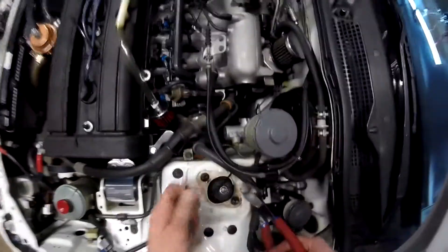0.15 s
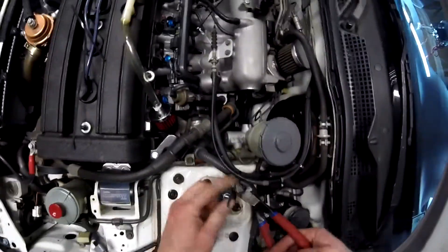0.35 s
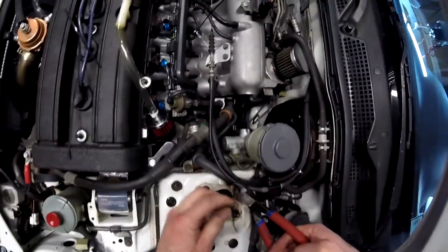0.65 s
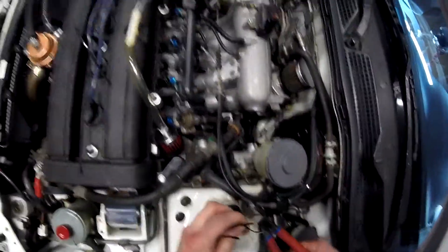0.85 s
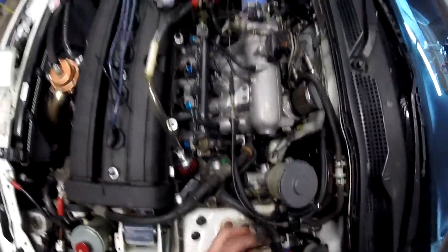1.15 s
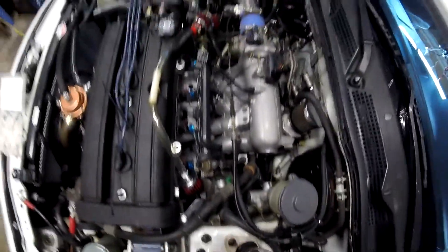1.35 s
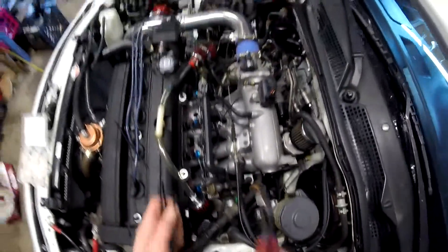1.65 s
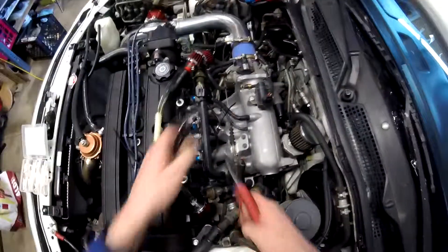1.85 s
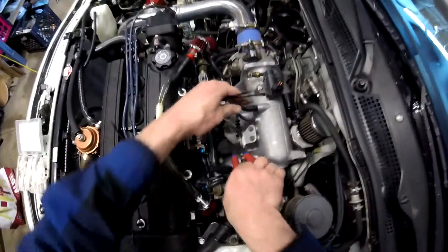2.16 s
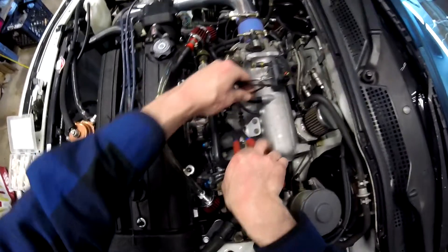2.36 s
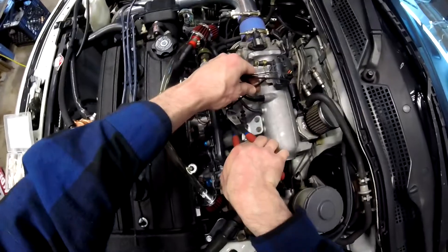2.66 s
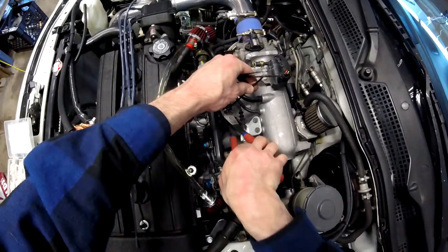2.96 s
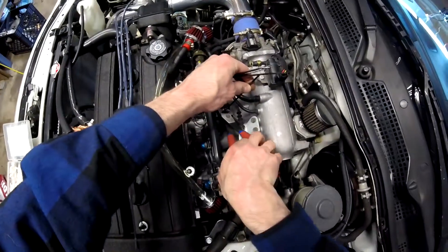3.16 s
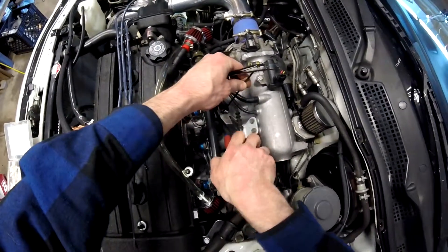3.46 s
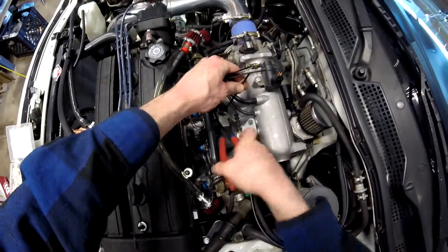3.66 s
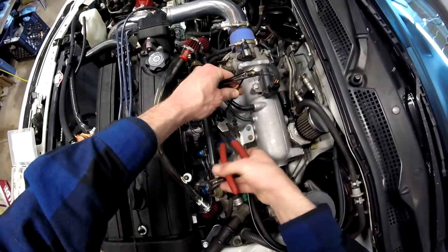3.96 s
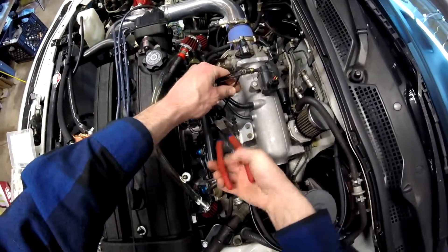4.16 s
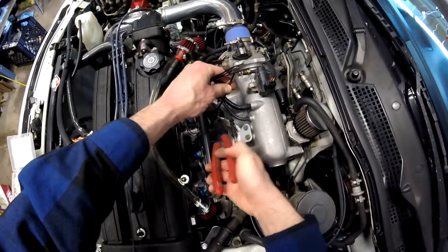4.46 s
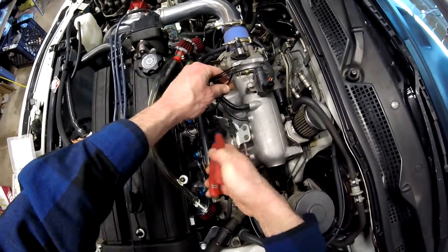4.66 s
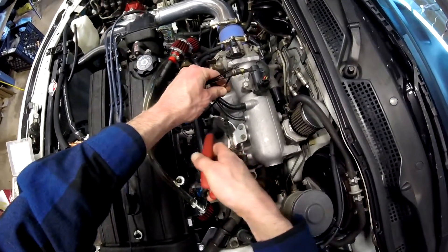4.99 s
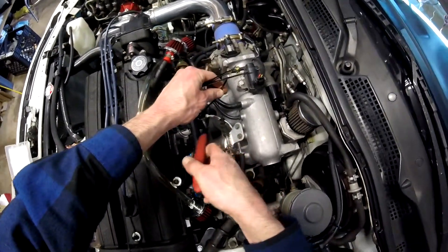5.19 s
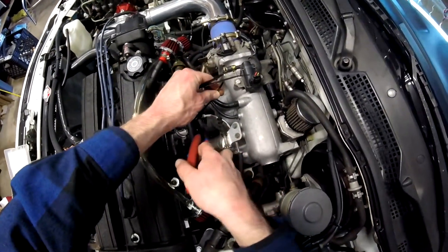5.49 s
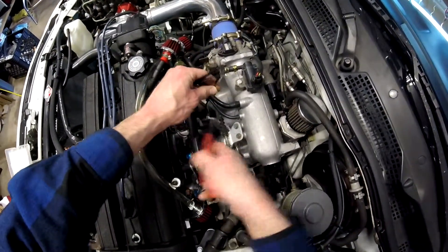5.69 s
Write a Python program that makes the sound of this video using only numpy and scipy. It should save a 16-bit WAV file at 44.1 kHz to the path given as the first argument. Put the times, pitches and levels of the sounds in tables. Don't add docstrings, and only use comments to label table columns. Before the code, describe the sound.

A sharp steel snip, then a tool clatters onto sheet metal and bounces, followed by faint pivot squeaks over a steady garage rumble and hum.

```python
import sys
import numpy as np
from scipy import signal
from scipy.fft import rfft, irfft
from scipy.io import wavfile
from scipy.ndimage import uniform_filter1d, minimum_filter1d

SR = 44100
rng = np.random.default_rng(int(sys.argv[2]) if len(sys.argv) > 2 else 0)


def store_wav(level_fs):
    pcm = np.round(np.clip(np.atleast_2d(level_fs), -1, 1) * 32767)
    wavfile.write(sys.argv[1], SR, pcm.T.astype(np.int16))


def ratio(d):
    e = np.asarray(d, float) / 20
    return 10 ** e


N = 257082
T = np.arange(N) / SR
CLIP_N = 22050


def unit(x):
    return x / np.sqrt(np.mean(x ** 2))


def band(x, hz, width_hz):
    return signal.lfilter(*signal.iirpeak(hz, hz / width_hz, SR), x)


def body(x, peaks):
    return sum((-1) ** k * ratio(db) * band(x, hz, width_hz) for k, (hz, width_hz, db) in enumerate(peaks))


def ring(x, hz, t60_s):
    pole = np.exp(2j * np.pi * hz / SR - np.log(1000) / (t60_s * SR))
    return signal.lfilter([1], [1, -pole], x).imag


def add(out, start_s, x):
    i = int(start_s * SR)
    out[i:i + len(x)] += x[:N - i]


def fade(t60_s):
    return np.exp(-np.log(1000) * np.arange(CLIP_N) / SR / t60_s)


def burst_noise():
    return rng.standard_normal(CLIP_N)


def walk(rate_hz):
    hold = int(SR / rate_hz)
    steps = np.repeat(rng.standard_normal(N // hold + 1), hold)
    return unit(uniform_filter1d(uniform_filter1d(steps, hold), hold)[:N])


def spectrum(points, hz):
    point_hz, point_db = np.transpose(points)
    return ratio(np.interp(np.log(np.maximum(hz, 1)), np.log(point_hz), point_db))


def strokes(rows, rise_db_s, fall_db_s):
    levels_db = []
    for start_s, hold_s, db in rows:
        before_s = np.maximum(start_s - T, 0)
        after_s = np.maximum(T - start_s - hold_s, 0)
        levels_db.append(db - rise_db_s * before_s - fall_db_s * after_s)
    return np.max(levels_db, axis=0)


def stick_slip(rows, breadth_hz):
    out = np.zeros(N)
    for start_s, length_s, from_hz, to_hz, db in rows:
        chance = rng.standard_normal((2, 12000))
        slip = signal.lfilter(*signal.butter(2, breadth_hz / 2, fs=SR), chance[0] + 1j * chance[1])[2000:]
        slip /= np.sqrt(np.mean(np.abs(slip) ** 2))
        grip = np.exp(-breadth_hz / 120) + min(breadth_hz / 110, 1) * slip
        u = np.clip(np.arange(10000) / SR / length_s, 0, 1)
        phase = 2 * np.pi * np.cumsum(from_hz + (to_hz - from_hz) * u) / SR
        add(out, start_s, ratio(db) * np.sin(np.pi * u) ** 0.25 * (grip * np.exp(1j * phase)).real)
    return out


def air():
    # frequency in Hz, density in dB per Hz.
    air_curve = [(8, 0.5), (15, 0.5), (40, 5), (62, 5.5), (84, 4), (120, -5.5), (170, -10.5), (205, -10.5),
                 (240, -15), (480, -20.5), (900, -24), (1500, -27), (3000, -30), (16000, -25.5)]
    # centre in Hz, width in Hz, factor in dB against the hiss there.
    ridge_hz, ridge_width_hz, ridge_db = (6470, 165, 0.1)
    level_db = -44
    shape = spectrum(air_curve, np.fft.rfftfreq(N, 1 / SR))
    noise = unit(irfft(rfft(rng.standard_normal(N)) * shape, N))
    noise = noise + ratio(ridge_db) * band(noise, ridge_hz, ridge_width_hz)
    bass = signal.filtfilt(*signal.butter(2, 130, fs=SR), noise)
    return ratio(level_db) * (bass * ratio(0.5 * walk(3.95)) + (noise - bass) * ratio(0.22 * walk(5.3)))


def hum():
    # frequency in Hz, level in dB rms.
    motor_lines = [(188.4, -63.5), (592.2, -74), (710.6, -62.5), (829.0, -75)]
    out = 0
    for hz, db in motor_lines:
        level = ratio(db + 2.0 + 0.83 * walk(6.0))
        out = out + level * np.sin(2 * np.pi * np.cumsum(hz + 0.37 * walk(1.99)) / SR)
    return out


def squeaks():
    # start in seconds, length in seconds, from Hz, to Hz, level in dB.
    squeak_rows = [(.0, 0.13, 2285, 2340, -63.5), (.77, 0.17, 2860, 2700, -62),
                   (3.52, 0.11, 2767, 2780, -62), (3.657, .072, 3370, 3300, -61),
                   (3.94, .065, 3200, 3150, -63), (4.07, .036, 3060, 3100, -60.5),
                   (4.137, 0.12, 924, 930, -64), (4.22, 0.077, 3500, 3470, -61),
                   (4.575, 0.15, 2860, 3100, -59.5), (4.67, .1, 3200, 3100, -61.5),
                   (4.72, .11, 2850, 2720, -60.5), (4.98, .069, 3110, 3080, -56.5),
                   (5.087, 0.045, 3550, 3330, -53), (5.29, 0.12, 2344, 2290, -62),
                   (5.69, 0.064, 2860, 2820, -68), (5.75, 0.066, 2880, 3060, -57.5),
                   (5.777, .06, 3200, 3380, -60.5)]
    return stick_slip(squeak_rows, breadth_hz=65.4)


def rustle():
    # start in seconds, hold in seconds, level in dB.
    movements = [(0, 0.2, -65.5), (.33, .01, -49), (.62, 0.0092, -59), (1.32, 0.14, -56.5),
                 (1.545, 0.0087, -51), (1.62, 0.014, -50), (1.8, 0.37, -69), (2.52, .01, -60.5),
                 (2.72, .01, -61.5), (3.68, .03, -68), (5.68, .1, -64)]
    # centre in Hz, width in Hz, gain in dB.
    cloth_peaks = [(1320, 2000, -7), (2490, 390, 4), (3500, 1200, 2), (4670, 1030, 6), (6270, 470, -3)]
    unevenness_db = 1.8 * walk(60.0) + 2.5 * walk(400.0)
    grains = rng.standard_normal(N) * ratio(unevenness_db)
    return unit(body(grains, cloth_peaks)) * ratio(strokes(movements, rise_db_s=248, fall_db_s=133))


def hoses():
    # start in seconds, hold in seconds, level in dB.
    reaches = [
        (0, 0.2, -63),
        (1.9, 0.41, -65.5),
    ]
    centre_hz, width_hz = 1000, 980
    brush = unit(band(rng.standard_normal(N) * ratio(3.4 * walk(40.3)), centre_hz, width_hz))
    return brush * ratio(strokes(reaches, rise_db_s=60, fall_db_s=60))


def ticks():
    # start in seconds, level in dB (the peak sits 6 dB above it), centre in Hz, width in Hz, decay
    # t60 in seconds.
    contacts = [(0.309, -38, 4520, 8950, 0.079), (.320, -38.5, 4550, 6000, 0.071),
                (0.552, -47.5, 477, 394, 0.21), (.554, -58, 1550, 250, 0.069), (.588, -58, 3200, 200, .4),
                (1.05, -53, 3000, 3950, 0.035), (1.173, -39, 2830, 905, 0.038),
                (1.175, -31, 866, 446, 0.16), (1.476, -43, 4250, 5000, .04), (1.91, -51, 5000, 3000, .083),
                (5.025, -53, 4500, 600, .096), (5.418, -50, 1970, 600, .04),
                (5.4357, -42, 2030, 505, 0.022), (1.512, -58, 4060, 4020, .03),
                (5.642, -46, 4200, 6000, .06)]
    out = np.zeros(N)
    for start_s, db, hz, width_hz, t60_s in contacts:
        burst = burst_noise() * fade(t60_s)
        burst[0] = 2.8
        tick = band(band(burst, hz, width_hz), hz, width_hz)
        add(out, start_s, 2 * ratio(db) * tick / np.abs(tick).max())
    return out


def snip():
    # start in seconds, impact in dB, grit in dB, grit length in seconds.
    contacts = [
        (0.9712, -48, -41, 0.0046),
        (.9750, 3.5, -18.5, 0.0018),
        (0.9759, -32, -18, 0.0015),
        (.9780, -5, -19, 0.0014),
        (0.9789, -22.5, -29, 0.0014),
        (0.984, -33, -53, 0.004),
    ]
    # centre in Hz, width in Hz, gain in dB.
    cutter_peaks = [(220, 52, 6.5), (1000, 110, -6.5), (2230, 440, 5.5), (3050, 420, 6.5), (4100, 250, 13),
                    (5650, 310, 16.5), (6590, 280, 10.5), (8500, 980, 3.5), (11700, 2300, -9)]
    # frequency in Hz, level in dB, decay t60 in seconds.
    jaw_modes = [(5560, -38, 0.08)]
    bursts, blow, spray = np.zeros(N), np.zeros(N), np.zeros(N)
    for k, (start_s, db, grit_db, length_s) in enumerate(contacts):
        grit = ratio(grit_db) * rng.standard_normal(600) * np.exp(-(np.arange(600) / SR / length_s) ** 2)
        grit[0] = (-1) ** k * ratio(db)
        add(bursts, start_s, grit)
    add(blow, contacts[1][0], np.ones(1))
    jaws = sum(ratio(db) * ring(blow, hz, t60_s) for hz, db, t60_s in jaw_modes)
    offcut = unit(band(burst_noise(), 3600, 3300))
    add(spray, contacts[3][0], ratio(-36.5) * fade(0.2) * offcut)
    return spray + body(bursts, cutter_peaks) + jaws


def tool_drop():
    # start in seconds, blow in dB, crack in dB, favoured frequency in Hz, spread in octaves.
    blows = [
        (1.1015, -12, -21, 304, 1.12),
        (1.1082, -21, -55, 713, 1.8),
        (1.113, -23.5, -52, 350, 0.58),
        (1.1208, -38, -39, 505, 1.3),
        (1.1738, -29.5, -41, 690, 0.66),
        (1.178, -37, -55, 1000, 0.25),
        (1.202, -44, -66, 890, 0.36),
    ]
    # frequency in Hz, level in dB, decay t60 in seconds.
    drop_modes = [(137.3, -11, 0.47), (162, -5, 0.38), (200, 0.5, 0.062), (273, -4.5, 0.065),
                  (300, -3, 0.073), (440, -0.5, 0.1), (554, -3.5, 0.08), (600, -20, 0.13),
                  (691, -9, 0.095), (820, -35, 0.1), (938, 5, 0.044), (931, 0, 0.12), (1000, -3, 0.083),
                  (1095, 3, 0.065), (1330, 2, 0.036), (1350, -14, .06), (1535, -2.5, 0.094),
                  (1673, 3, 0.11), (1920, -16, 0.081), (2335, 0, 0.098), (2540, -20, 0.056),
                  (2980, -16, .08), (3990, -17, .04), (4730, -13, .05)]
    all_modes = drop_modes
    out, t = np.zeros(N), np.arange(CLIP_N) / SR
    for j, (start_s, db, crack_db, spot_hz, spread_oct) in enumerate(blows):
        push_s = 0.34 / spot_hz
        push = np.exp(-((t - 2 * push_s) / (0.17 * push_s)) ** 2)
        push /= push.sum()
        chance = rng.standard_normal((len(all_modes), 2))
        modes = 0
        for k, ((hz, mode_db, t60_s), (a, b)) in enumerate(zip(all_modes, chance)):
            reach_db = -6.0 * (np.log2(hz / spot_hz) / spread_oct) ** 2
            sign = (-1) ** (j * k)
            modes = modes + sign * ratio(mode_db + reach_db + 2 * a) * ring(push, hz * (1 + 0.011 * b), t60_s)
        crack = unit(band(band(burst_noise(), 4240, 1200), 3970, 2000))
        crack *= fade(0.044) + ratio(-14) * fade(0.14)
        rattle = unit(band(burst_noise(), 0.98 * spot_hz, 0.5 * spot_hz))
        rattle *= (fade(0.24) + ratio(-11) * fade(0.69)) * (1 - fade(0.0041))
        add(out, start_s, ratio(db - 8.5) * modes + ratio(db - 19.5) * rattle + ratio(crack_db) * crack)
    return signal.lfilter(*signal.butter(2, 125, "high", fs=SR), out)


def jaw_rub():
    # start in seconds, hold in seconds, level in dB.
    rubs = [
        (1.288, 0.045, -48),
        (1.356, .012, -50.5),
        (1.405, 0.0089, -54.5),
        (1.45, 0.019, -52.5),
        (1.735, 0.017, -54.5),
        (1.8, .015, -58),
        (5.045, 0.052, -51.5),
        (5.125, 0.026, -55.5),
        (5.19, 0.092, -57.5),
    ]
    # frequency in Hz, width in Hz, level in dB, extra fall in dB per dB of softer rubbing.
    rub_modes = [(3585, 160, 7, 1), (6055, 110, -4, 1.2)]
    db = strokes(rubs, rise_db_s=700, fall_db_s=400)
    sag_hz = 3.5 * np.clip(db + 50.5, -15, 0)
    out = 0
    for hz, width_hz, mode_db, fall in rub_modes:
        rough = unit(band(band(rng.standard_normal(N), hz, width_hz), hz, 2 * width_hz))
        tone = 1.15 * np.sin(2 * np.pi * np.cumsum(hz + sag_hz) / SR) + 0.55 * rough
        out = out + ratio(db + mode_db + fall * (db + 45.5)) * tone
    return out


def chafes():
    # start in seconds, length in seconds, from Hz, to Hz, level in dB.
    chafe_rows = [
        (1.54, .083, 3270, 3500, -50.5),
        (3.212, 0.062, 3140, 2970, -63),
        (3.99, .077, 4800, 4300, -58),
        (4.128, 0.063, 3900, 3770, -59),
        (4.183, 0.075, 3170, 3000, -60.5),
        (4.52, 0.108, 3810, 3670, -57),
        (4.938, 0.058, 3960, 3960, -58),
        (5.04, 0.16, 3120, 3130, -65),
        (5.646, 0.12, 4100, 4040, -59),
        (5.7, .07, 5250, 5250, -61),
    ]
    return stick_slip(chafe_rows, breadth_hz=282)


def room(x):
    first_s = 0.00048
    noise = burst_noise()
    low = signal.lfilter(*signal.butter(1, 1500, fs=SR), noise)
    tail = low * fade(0.69) + (noise - low) * fade(0.24)
    tail *= np.clip(np.arange(CLIP_N) / SR / first_s - 1, 0, 1)
    return signal.fftconvolve(x, tail / np.sqrt(np.sum(tail ** 2)))[:N]


def scene():
    background = air() + hum()
    small = squeaks() + rustle() + hoses() + jaw_rub() + chafes()
    tick, cut, fall = ticks(), snip(), tool_drop()
    echo = room(ratio(-19.5) * tick + ratio(-16) * cut + ratio(-16) * fall + ratio(-6) * small)
    gain_db = -0.78 + 0.26 * T
    return (tick + cut + fall + small + echo + ratio(gain_db) * background)[None]


def microphone(x):
    # frequency in Hz, gain in dB.
    housing = [(3000, 1), (3600, -4), (4600, -8), (5900, -6.5), (6550, 2.5), (7000, -0.5), (9000, -6.5),
               (9900, -12), (10300, -14.5), (11700, -13), (12500, -14.5), (13500, -21), (14300, -21),
               (15000, -36)]
    cepstrum = irfft(np.log(spectrum(housing, np.fft.rfftfreq(1024, 1 / SR))))
    cepstrum[1:512] *= 2
    cepstrum[513:] = 0
    return signal.fftconvolve(x, irfft(np.exp(rfft(cepstrum)))[None, :512])[:, :N]


def starve(x):
    # frequency in Hz, share of moments dropped.
    holes = [(3300, 0), (4500, .07), (5600, .02), (6200, 0), (9800, 0), (10300, .25), (10900, .06),
             (12500, .08), (13500, .3), (14500, .65), (15000, .9)]
    hz, _, z = signal.stft(x[0], SR, nperseg=2048)
    power = uniform_filter1d(np.abs(z) ** 2, size=6, axis=0)
    rank = power.argsort(axis=1).argsort(axis=1) / power.shape[1]
    dropped = rank < np.interp(hz, *np.transpose(holes))[:, None]
    kept = minimum_filter1d(1. - dropped, size=3, axis=0)
    return signal.istft(z * kept, SR, nperseg=2048)[1][None, :N]


def band_limit(x):
    return signal.sosfilt(signal.butter(12, 14960, fs=SR, output="sos"), x)


def record(dry):
    mix = starve(microphone(dry))
    return band_limit(mix)


dry = scene()
out = record(dry)
store_wav(out)
```